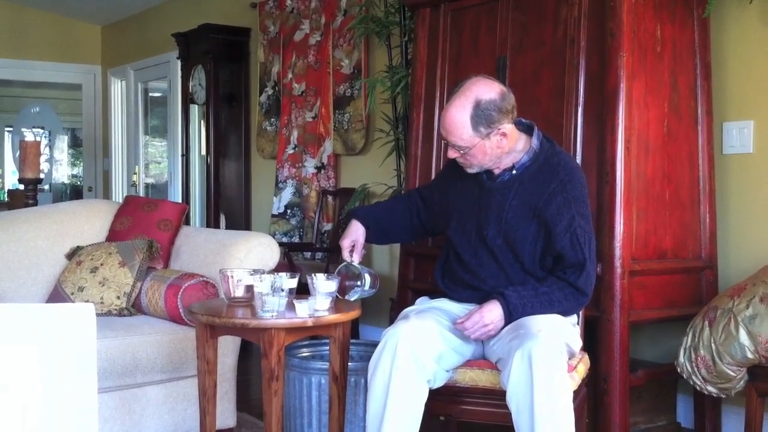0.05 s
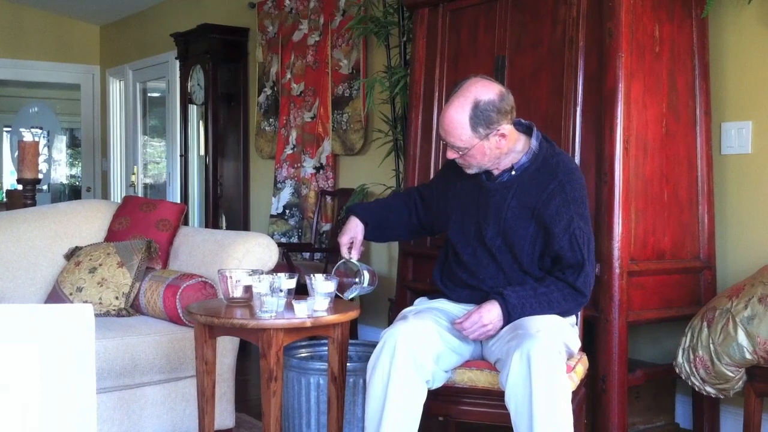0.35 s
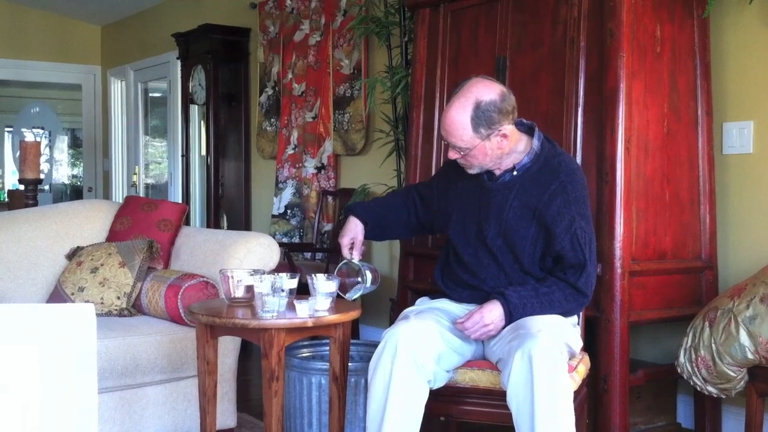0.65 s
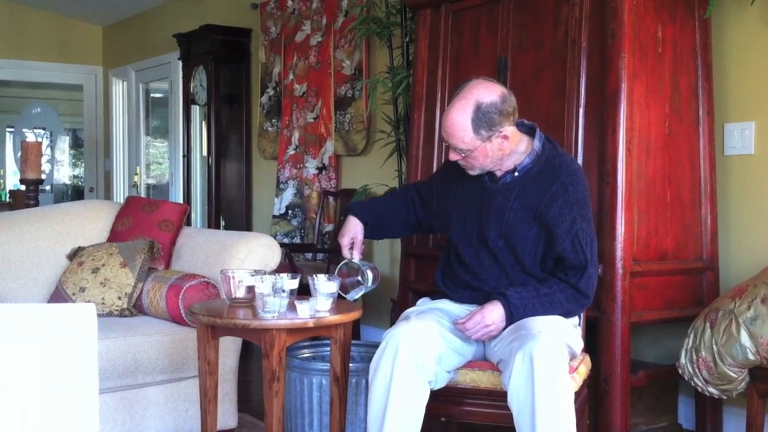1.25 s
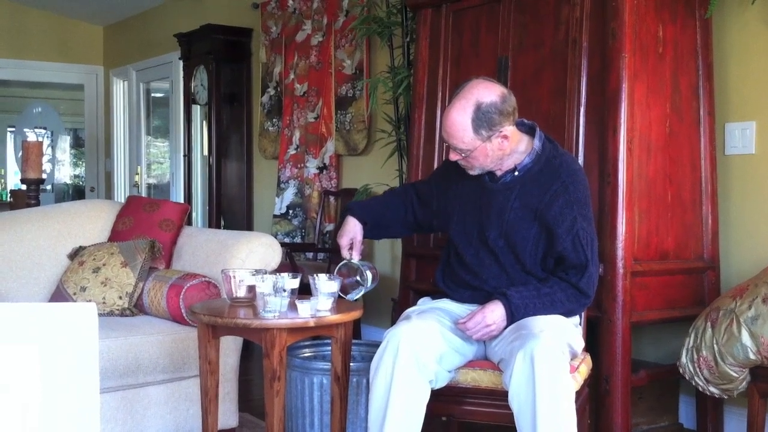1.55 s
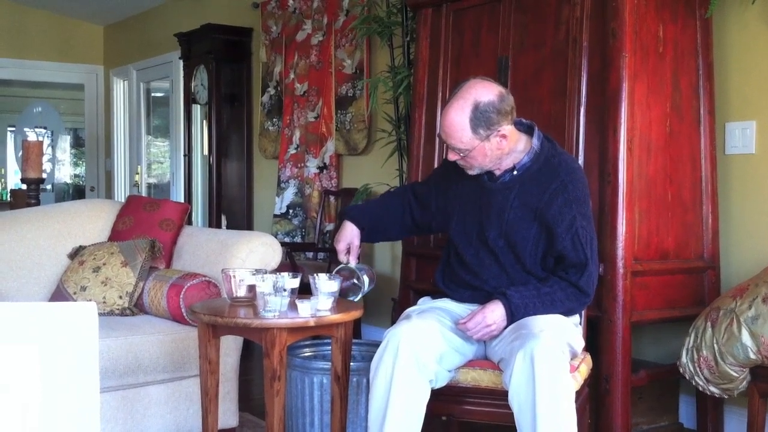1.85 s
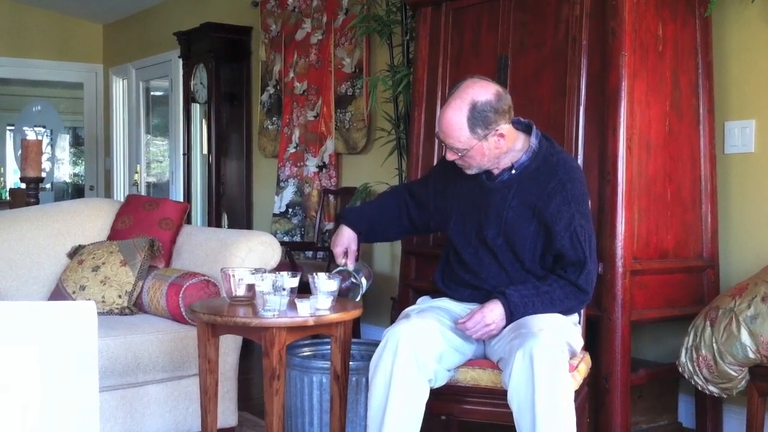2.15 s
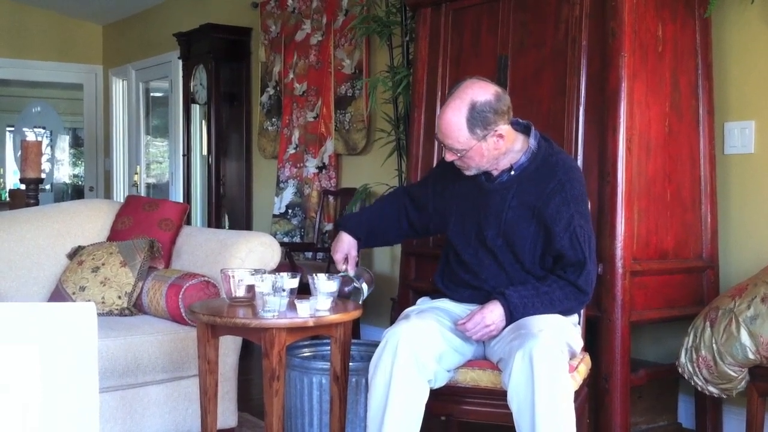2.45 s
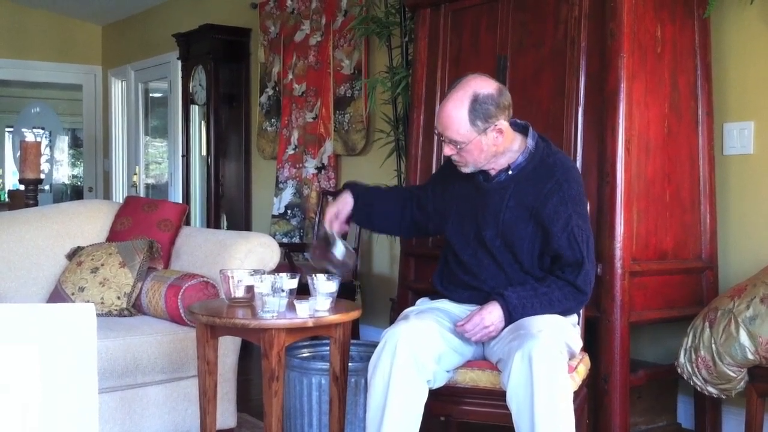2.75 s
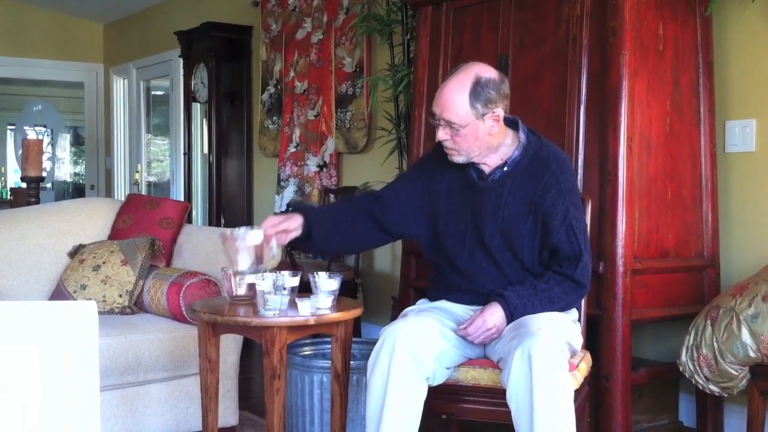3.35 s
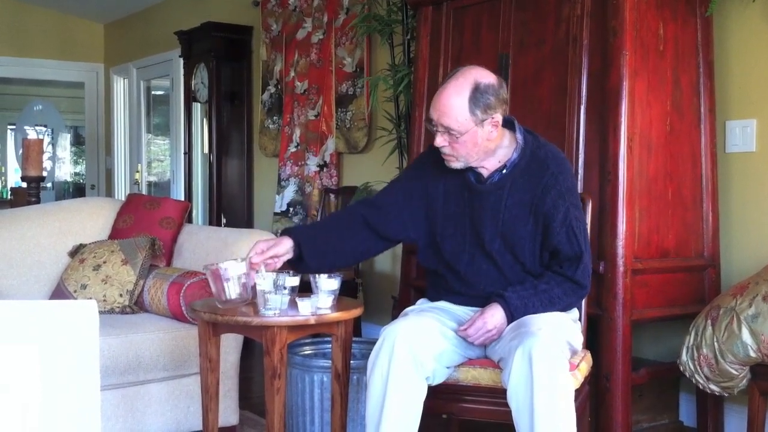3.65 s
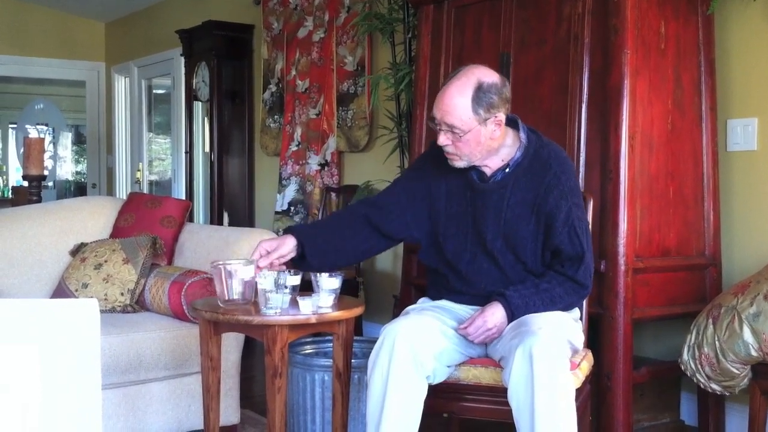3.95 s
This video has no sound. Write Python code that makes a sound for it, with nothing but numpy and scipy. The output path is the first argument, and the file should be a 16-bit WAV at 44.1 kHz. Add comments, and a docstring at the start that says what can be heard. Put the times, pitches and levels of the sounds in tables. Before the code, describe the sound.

Small metal pellets pour loudly into a steel trash can from the start, a dense, bright clatter surging over the can's hollow boom. Near 2.4 seconds the stream stops and the can rings on faintly. A few last pellets tick, and the emptied cup rubs softly in the hand around 3 seconds. At 3.7 seconds the cup knocks onto a wooden table and rocks once in the quiet room.

```python
"""Small metal pellets pour from a cup into a steel trash can in a living room.
From the start, thousands of impacts clatter and make the can boom. Near 2.4 s the stream stops
and the can rings on faintly. The last pellets settle; the emptied cup rubs and ticks in the hand.
At 3.7 s it is set down on a wooden table with a knock and a small rock."""
import sys
import numpy as np
from scipy import signal
from scipy.io import wavfile
from scipy.ndimage import uniform_filter1d

SR = 44100
rng = np.random.default_rng(int(sys.argv[2]) if len(sys.argv) > 2 else 0)


def wav_out(sig):
    """Save sig, one row per channel (or a flat mono array), as 16-bit PCM at SR to the path in sys.argv[1]."""
    wavfile.write(sys.argv[1], SR, np.round(np.clip(np.atleast_2d(sig).T, -1, 1) * 32767).astype(np.int16))


N = 176400

# room noise spectrum: freq_hz, density_db
ROOM_NOISE = [(25,1.5),(50,-11),(80,-7),(115,-4),(180,-0.5),(320,-10.5),(700,-16),(1200,-17.5),(4000,-21.5),(8000,-26),(11000,-31.5),(15500,-39.5)]
# room decay: freq_hz, t60_s
ROOM_DECAY = [(150,0.85),(530,0.44),(1400,.42),(3700,.45),(9000,0.3),(11500,.32),(15000,0.24)]

# spectrum of the hand's rub on the cup: freq_hz, density_db
RUB_SPECTRUM = [(300,-13),(900,-5),(1700,1),(3000,-8),(8000,-13),(15000,-20)]
# ticks of the last pellets and the cup: start_s, level_db, pitch_hz
TICKS = [(2.587,-37,8400),(2.632,-40,8000),(2.930,-49,8500),(2.961,-51,7500),(3.104,-45,9000),(3.538,-38.5,4100)]
# cup-table contacts: start_s, level_db, treble_db, cup_ring_db
CONTACTS = [(3.6739,-10,-5,-2),(3.6795,-7.5,-3.5,-20),(3.6822,-1.5,-4.5,-26),(3.6895,-4,-7,-22),(3.699,-7.5,-2,-20),(3.7766,-22,3,8),(3.785,-25.5,3.5,2),(3.794,-20,-1,-13)]
# dull part of a contact: freq_hz, density_db
THUD_SPECTRUM = [(50,-40),(110,-31),(160,-16),(300,-18),(450,-4),(620,12),(740,2.5),(880,3),(1000,3),(1350,2),(1900,-4),(2500,-8),(3100,-49),(6000,-55)]
# bright part of a contact: freq_hz, density_db
CRACK_SPECTRUM = [(60,-47),(500,8),(2500,-8),(3500,1),(4300,-4),(5100,0),(6000,-5.5),(7200,2),(8800,-4),(11000,-7.5),(13500,-20),(15500,-44)]
# cup modes: pitch_hz, level_db, t60_s
CUP_MODES = [(2410,-11.5,0.028),(2610,-12,0.032),(3410,-15,0.037)]
# table modes: pitch_hz, level_db, t60_s
TABLE_MODES = [(457,-22,0.1),(497,-10,0.12),(617,4,0.097),(730,-13,0.11),(860,-4,0.077),(874,-1,0.11),(902,1.5,0.073),(1077,-9,0.17),(1143,-4,0.14),(1290,-6,0.096),(1313,2,0.11),(1368,-7,0.1),(1760,-13,0.11),(2070,-18,0.077),(2370,-26,.1)]

# clumps of pellets landing together: start_s, clatter_lift_db, clang_lift_db
CLUMPS = [(0.003,5.5,-0.5),(0.126,2,3),(0.194,3,6.5),(0.281,1.5,5),(0.386,3.5,3),(0.437,1,-2.5),(0.794,6.5,-2),(0.827,3.5,1.5),(1.035,2.5,-0.5),(1.129,5.5,-3),(1.324,1,1.5),(1.438,2,1.5),(1.679,1,0),(1.866,0,-6),(2.344,6,-1),(2.397,10,-3)]
# one pellet's click: freq_hz, density_db
CLICK_SPECTRUM = [(300,-42.5),(1500,-20.5),(2900,-5.5),(3400,-1),(4200,-2.5),(5100,-9),(6000,0),(6800,-1.5),(8400,2.5),(10000,-0.5),(11000,-5),(12500,-5.5),(14000,-13),(15500,-25)]
# pellet clatter envelope: time_s, level_db
CLATTER_LEVEL = [(0.0,-19.5),(0.01,-19.5),(0.13,-16),(0.25,-20),(0.35,-24),(0.5,-19.5),(0.63,-21.5),(0.65,-20.5),(0.68,-25),(0.75,-29),(0.78,-26),(0.8,-26.5),(0.9,-26.5),(0.94,-18.5),(0.96,-20.5),(0.99,-19),(1.06,-17.5),(1.16,-21),(1.2,-24.5),(1.23,-18.5),(1.29,-25),(1.35,-22.5),(1.45,-20.5),(1.47,-23.5),(1.53,-18.5),(1.64,-24),(1.68,-19),(1.8,-23.5),(2.05,-21),(2.22,-18.5),(2.32,-25.5),(2.39,-31.5),(2.42,-33),(2.46,-40.5)]
# zing, a cluster of high wall modes: freq_hz, density_db
ZING_SPECTRUM = [(2500,-44),(4100,-15.5),(4650,-4),(5030,-.5),(5300,-3.5),(5650,-23.5),(8000,-45.5)]
# zing envelope: time_s, level_db
ZING_LEVEL = [(0.0,-30.5),(0.02,-21.5),(0.13,-24),(0.149,-15.5),(0.16,-23),(0.23,-22),(0.27,-37.5),(0.29,-17.5),(0.31,-33),(0.44,-24.5),(0.52,-24.5),(0.66,-28),(0.77,-41),(0.81,-29.5),(0.92,-32.5),(0.94,-24.5),(0.96,-29.5),(0.99,-24),(1.12,-29),(1.14,-20.5),(1.18,-28),(1.36,-30),(1.57,-24),(1.6,-33.5),(1.66,-29.5),(1.68,-27.5),(1.7,-27.5),(1.919,-31),(1.95,-27),(2.01,-29.5),(2.19,-27),(2.21,-25.5),(2.23,-33.5),(2.28,-27.5),(2.42,-41.5),(2.46,-50)]
# clang, the wash of many wall modes: freq_hz, density_db
CLANG_SPECTRUM = [(150,-46),(450,-16),(780,-1.5),(950,-4),(1150,1),(1550,-.5),(1800,0),(2300,1),(2900,-8.5),(5000,-22),(12000,-50)]
# clang envelope: time_s, level_db
CLANG_LEVEL = [(0.0, -31.5), (0.06, -26.5), (0.09, -26), (0.12, -28), (0.3, -31.5), (0.64, -27),
               (0.75, -33), (0.77, -29.5), (0.87, -32), (1.04, -26.5), (1.18, -30.5), (1.491, -27),
               (1.84, -28), (1.87, -25), (1.91, -28.5), (2.23, -25), (2.42, -42), (2.46, -48.5)]
# hollow drumming of the can: freq_hz, density_db
DRUM_SPECTRUM = [(30,-36),(70,-35),(110,-26),(150,-17),(200,-10),(250,-5.5),(300,-9.5),(400,0.5),(540,4),(720,-4),(1000,-15.5),(4000,-54.5)]
# drumming envelope: time_s, level_db
DRUM_LEVEL = [(0.0,-29.5),(0.04,-28.5),(0.201,-26),(0.35,-33.5),(0.44,-27.5),(0.52,-29.5),(0.6,-24.5),(0.7,-34),(0.8,-27),(0.95,-35),(1.0,-24),(1.13,-27.5),(1.2,-27.5),(1.3,-29.5),(1.4,-24),(1.46,-31.5),(1.48,-36.5),(1.55,-22.5),(1.63,-32),(1.7,-34),(1.77,-27),(1.95,-29),(2.18,-30.5),(2.27,-32.5),(2.42,-66)]
# boom of the can's floor: freq_hz, density_db
BOOM_SPECTRUM = [(60,-48.5),(105,-35),(135,-19.5),(158,-7),(171,2.5),(186,-10.5),(210,-15.5),(300,-33),(1000,-68)]
# boom envelope: time_s, level_db
BOOM_LEVEL = [(0.0,-39.5),(0.109,-37),(0.15,-41),(0.24,-44.5),(0.35,-47),(0.46,-33),(0.509,-40),(0.55,-34.5),(0.64,-41),(0.74,-53),(0.801,-42.5),(0.95,-44.5),(1.131,-37.5),(1.19,-47),(1.36,-41.5),(1.49,-45.5),(1.55,-35.5),(1.66,-52),(1.77,-44),(1.87,-40),(1.92,-44.5),(2.02,-42),(2.13,-57),(2.2,-40),(2.29,-42.5),(2.34,-61)]
# lingering shimmer of the can: freq_hz, density_db
SHIMMER_SPECTRUM = [(40,-42),(130,-28.5),(220,-14),(500,15.5),(1000,1.5),(1700,4.5),(2600,-12.5),(3500,-8),(5200,-4),(6000,-7.5),(8500,-11),(11000,-19),(15000,-35.5)]
# strong can modes: pitch_hz, level_db, t60_s
CAN_MODES = [(406,-15.5,0.5),(498,-18,0.2),(527.8,-10.5,0.15),(557,-17.5,0.15),(623.5,-5.5,0.33),(704,-19.5,0.13),(806.7,-17,0.057),(1108,-16.5,.12),(1133.5,-13.5,.14),(1252,-14.5,0.091),(1338,-16.5,0.34),(1780,-10.5,.07)]
# high can modes: pitch_hz, level_db, t60_s
CAN_HIGH_MODES = [(3800,-18.5,.04),(4990,-23,0.027),(7500,-20.5,.03),(8800,-13,.02),(9335,-15.5,0.031)]
# long, quiet can modes: pitch_hz, level_db, t60_s
CAN_LONG_MODES = [(170,-25.5,4),(236.4,-30.5,3.9),(302,-41.5,11),(357,-44,1.8),(440,-40.5,2.9),(427,-37,2.1),(480,-36.5,2),(563,-37,2.8),(660,-44,1.8),(700,-40.5,1.3)]


def amp(db):
    """Decibels to gain."""
    return 10 ** (np.asarray(db) / 20)


def unit(x):
    """Scale to unit energy."""
    return x / np.sqrt(np.sum(x ** 2) + 1e-20)


def lookup(points, hz):
    """Interpolate on a log-frequency axis."""
    freq_hz, value = np.transpose(points)
    return np.interp(np.log(hz + 1), np.log(freq_hz + 1), value)


def add(mix, start_s, sound):
    """Mix in place from start_s."""
    part = mix[round(start_s * SR):][:len(sound)]
    part += sound[:len(part)]


def convolve(x, response):
    """Convolve, keeping the length."""
    return signal.fftconvolve(x, response)[:len(x)]


def decay(t, t60_s):
    """Exponential fall, 60 dB per t60_s."""
    return np.exp(-np.log(1000) * t / t60_s)


def wander(size, span_s):
    """Smooth random drift of unit spread."""
    drift = uniform_filter1d(rng.standard_normal(size), max(2, int(span_s * SR)))
    return drift / drift.std()


def colour(spectrum, size=4096):
    """Minimum-phase filter of unit energy."""
    log_gain = np.log(amp(lookup(spectrum, abs(np.fft.fftfreq(size, 1 / SR)))))
    response = np.exp(np.conj(signal.hilbert(log_gain)))
    return unit(np.fft.ifft(response).real[:size // 2])


def burst(spectrum, t60_s, size=16384):
    """Dense modes, struck once, dying together."""
    noise = rng.choice([-1., 1.], size) * decay(np.arange(size) / SR, t60_s)
    return unit(convolve(noise, colour(spectrum)))


def ring(modes):
    """Modes struck together by a brief contact."""
    out = np.zeros(N)
    for hz, db, t60_s in modes:
        t = np.arange(min(N, int(t60_s * SR))) / SR
        partial = np.cos(2 * np.pi * hz * t) * decay(t, t60_s)
        contact = signal.butter(1, min(2 * hz, SR / 2 - 1), fs=SR)
        add(out, 0, amp(db) * unit(signal.lfilter(*contact, partial)))
    return out


def room(x, wet_db, size=32768):
    """Direct sound plus sparse reflections, power kept."""
    taps = rng.choice([-1., 1.], size) * (rng.random(size) < .12)
    taps[:SR // 250] = 0  # 4 ms pre-delay
    hz, t, bands = signal.stft(taps, SR, nperseg=256)
    tail = signal.istft(bands * decay(t, lookup(ROOM_DECAY, hz)[:, None]), SR)[1]
    return (x + amp(wet_db) * convolve(x, unit(tail))) / np.hypot(1, amp(wet_db))


def room_noise(level_db=-65.5):
    """Faint, steady, mostly low noise."""
    return amp(level_db) * convolve(rng.standard_normal(N), colour(ROOM_NOISE))


def cup_rub(start_s=2.912, length_s=0.078, level_db=-67.5, grains_per_s=1300):
    """Grainy rub of the hand as the cup is lifted."""
    t = np.arange(N) / SR
    grains = rng.standard_normal(N) * (rng.random(N) < grains_per_s / SR)
    stroke = np.sin(np.pi * np.clip((t - start_s) / length_s, 0, 1))
    return amp(level_db) * convolve(stroke * grains / grains.std(), colour(RUB_SPECTRUM))


def ticks(log_step=0.14):
    """The last pellets settle; the cup ticks as it is carried."""
    out = np.zeros(N)
    for start_s, db, hz in TICKS:
        peak = [(hz * np.exp(k * log_step), -3 * k * k) for k in range(-3, 4)]
        add(out, start_s, amp(db) * burst(peak, t60_s=0.055))
    return out


def cup_knock(thud_db=6.5, crack_db=-6.5, table_db=-4, t60_s=0.041):
    """The cup lands in quick contacts, rocks once and rings the table."""
    out = np.zeros(N)
    wood, cup = amp(table_db) * ring(TABLE_MODES), ring(CUP_MODES)
    for start_s, db, treble_db, cup_db in CONTACTS:
        thud = amp(thud_db) * burst(THUD_SPECTRUM, t60_s)
        crack = amp(crack_db + treble_db) * burst(CRACK_SPECTRUM, t60_s)
        add(out, start_s, amp(db) * (thud + crack))
        add(out, start_s, amp(db) * (wood + amp(cup_db) * cup))
    return out


def after_ring(drive):
    """Long can modes store energy from the stream, then decay freely."""
    t, out = np.arange(len(drive)) / SR, np.zeros(len(drive))
    for hz, db, t60_s in CAN_LONG_MODES:
        retained = decay(1 / SR, t60_s) ** 2
        energy = signal.lfilter([1 - retained], [1, -retained], drive ** 2)
        out += amp(db) * np.sqrt(2 * energy) * np.sin(2 * np.pi * (hz * t + rng.random()))
    return out


def can_ring(t, drum_hits, clang_hits, clatter_hits, split_hz=750, muffle_db_per_s=4.5):
    """Hits ring the can's modes; the growing pile muffles the high ones."""
    low = ring([mode for mode in CAN_MODES if mode[0] < split_hz])
    mid = ring([mode for mode in CAN_MODES if mode[0] >= split_hz])
    shimmer = amp(-26) * burst(SHIMMER_SPECTRUM, t60_s=1.4, size=N)
    muffle = amp(-muffle_db_per_s * np.maximum(t, 0))
    return (convolve(drum_hits, low) + convolve(clang_hits, mid + shimmer)
            + convolve(clatter_hits * muffle, ring(CAN_HIGH_MODES)))


def flow_gain(t, curve, surge_db, advance_s=.005, stop_db_per_s=217):
    """Hit envelope, just ahead of the level it builds; falls fast past the curve's end."""
    level_db = np.interp(t + advance_s, *np.transpose(curve))
    stop_db = stop_db_per_s * np.maximum(t - curve[-1][0], 0)
    return amp(level_db + surge_db - stop_db)


def clump_gain(t, column, drain_s=.022):
    """Each clump lifts the flow at once, then drains away."""
    lift_db = sum(row[column] * (t >= row[0]) * np.exp(-abs(t - row[0]) / drain_s) for row in CLUMPS)
    return amp(lift_db)


def pellet_hits(flow, peak_hits_per_s=6000, size_spread_db=3):
    """Random impacts of unit power; their rate follows the flow."""
    chance = peak_hits_per_s / SR * np.clip(flow / flow.max(), .03, 1)
    landed = rng.random(len(flow)) < chance
    strength = amp(size_spread_db * np.minimum(rng.exponential(1, len(flow)), 4))
    hits = landed * strength * rng.choice([-1., 1.], len(flow)) / np.sqrt(chance)
    return hits / hits.std()


def pellet_clicks(t, hits, detune, dull_start_s=2.22, dull_fade_s=0.2, dull_hz=9200):
    """Bright clicks, duller as the last pellets land on the pile."""
    spectrum = [(hz * (1 + detune), db) for hz, db in CLICK_SPECTRUM]
    bright = convolve(hits, burst(spectrum, t60_s=0.05))
    soft = signal.convolve(bright, signal.firwin(11, dull_hz, fs=SR), "same")
    blend = np.clip((t - dull_start_s) / dull_fade_s, 0, 1)
    return bright + blend * (soft - bright)


def pour(spots=8, max_detune=0.035, wander_db=5, surge_spread_db=0.79):
    """The stream wanders over spots on the can, each with its own click pitch."""
    preroll = SR // 2  # already running at t = 0
    t = np.arange(-preroll, N) / SR
    surge_db = surge_spread_db * wander(len(t), span_s=.012)
    curves = CLATTER_LEVEL, ZING_LEVEL, CLANG_LEVEL, DRUM_LEVEL, BOOM_LEVEL
    clatter, zing, clang, drum, boom = (flow_gain(t, curve, surge_db) for curve in curves)
    clatter *= clump_gain(t, column=1)
    clang *= clump_gain(t, column=2)
    hits = pellet_hits(clatter)
    odds = np.array([amp(wander_db * wander(len(t), span_s=.15)) for _ in range(spots)])
    spot = np.argmax(odds / rng.exponential(1, odds.shape), axis=0)  # weighted draw
    out = amp(2) * convolve(hits * boom, colour(BOOM_SPECTRUM))
    for k, detune in enumerate(np.linspace(-max_detune, max_detune, spots)):
        spot_hits = hits * (spot == k)
        direct = amp(-1) * pellet_clicks(t, spot_hits * clatter, detune)
        direct += amp(-1.5) * convolve(spot_hits * zing, burst(ZING_SPECTRUM, t60_s=0.037))
        direct += amp(0.5) * convolve(spot_hits * clang, burst(CLANG_SPECTRUM, t60_s=0.037))
        direct += amp(-4.5) * convolve(spot_hits * drum, burst(DRUM_SPECTRUM, t60_s=0.11))
        out += room(direct, wet_db=-4.5)
    out += can_ring(t, hits * drum, hits * clang, hits * clatter) + after_ring(drum)
    return out[preroll:]


def scene():
    """Room noise, pour and cup handling; mono on two channels."""
    mono = room_noise() + pour() + room(cup_knock() + ticks() + cup_rub(), wet_db=-5)
    return np.array([mono, mono])


def record(dry, low_cut_hz=163, high_cut_hz=15650):
    """Low cut and steep band limit."""
    thin = signal.sosfilt(signal.butter(2, low_cut_hz, "high", fs=SR, output="sos"), dry)
    lowpass = signal.firwin(511, high_cut_hz, window=("kaiser", 9), fs=SR)
    return signal.oaconvolve(thin, lowpass[None], "same")


dry = scene()
out = record(dry)
wav_out(out)
```